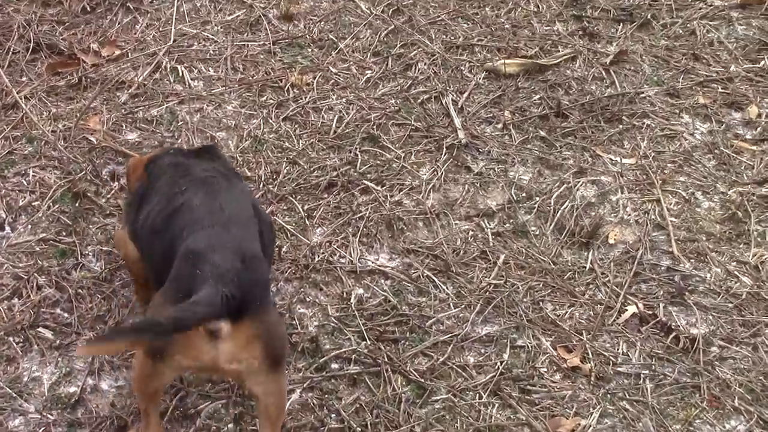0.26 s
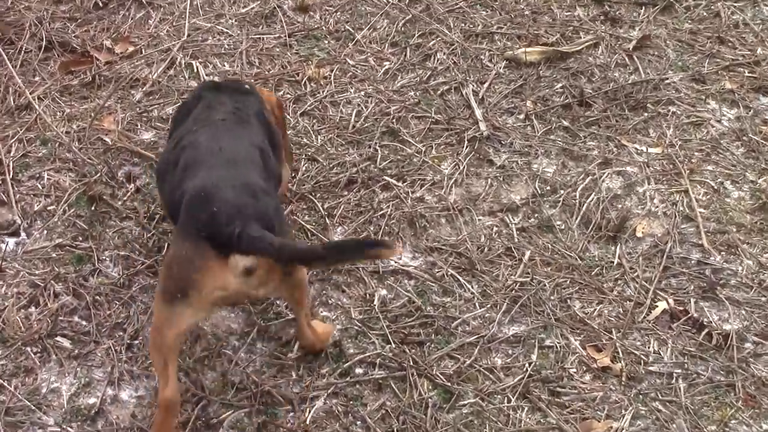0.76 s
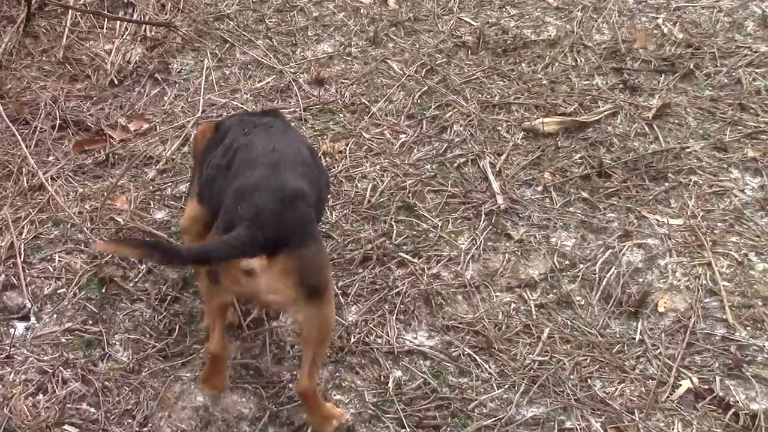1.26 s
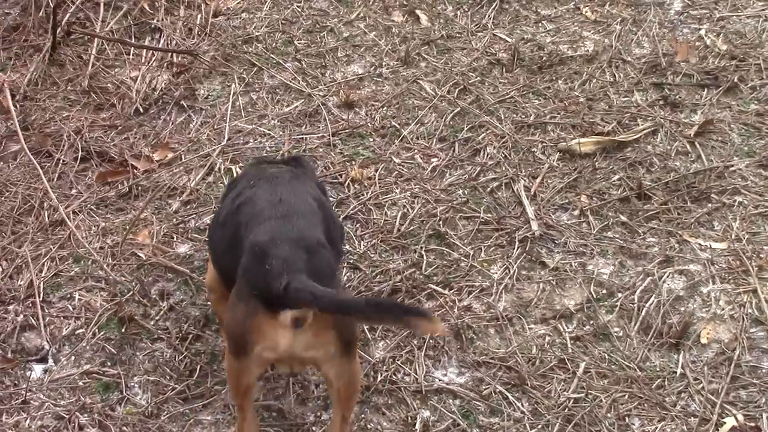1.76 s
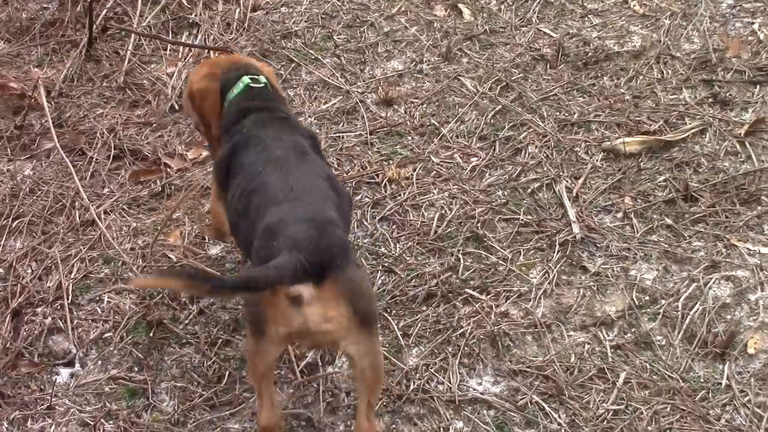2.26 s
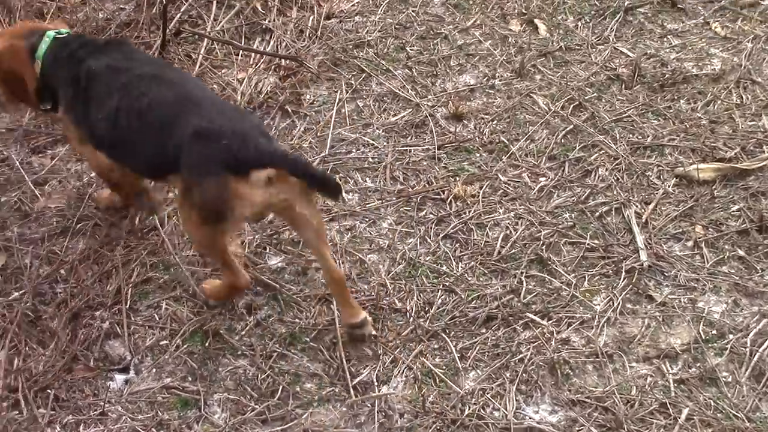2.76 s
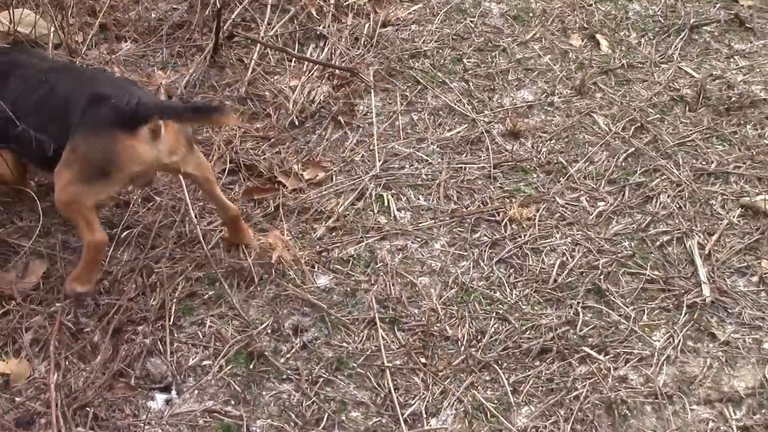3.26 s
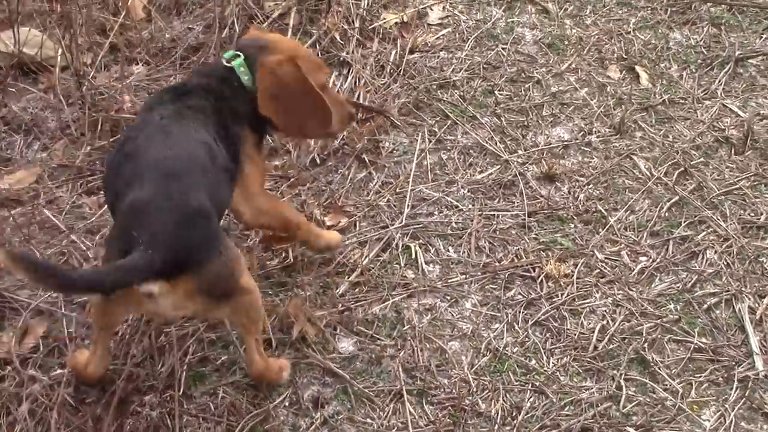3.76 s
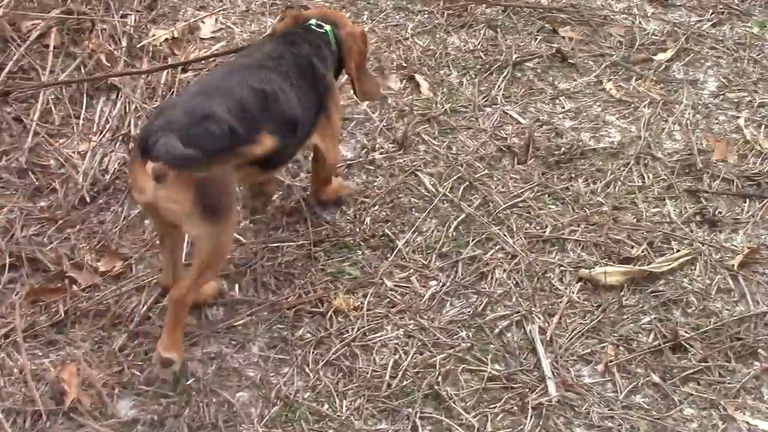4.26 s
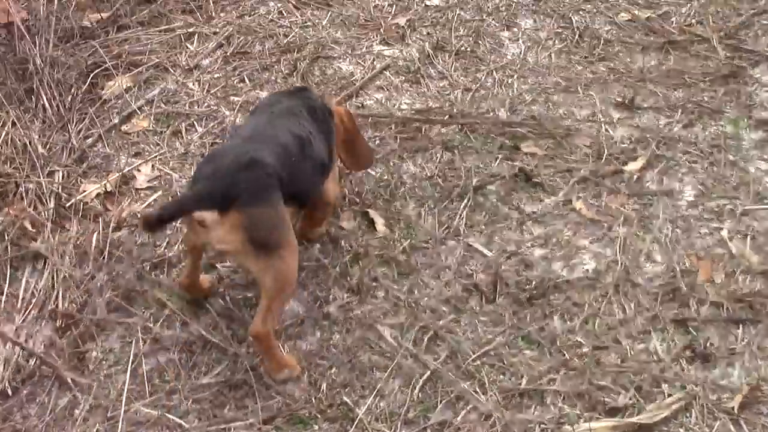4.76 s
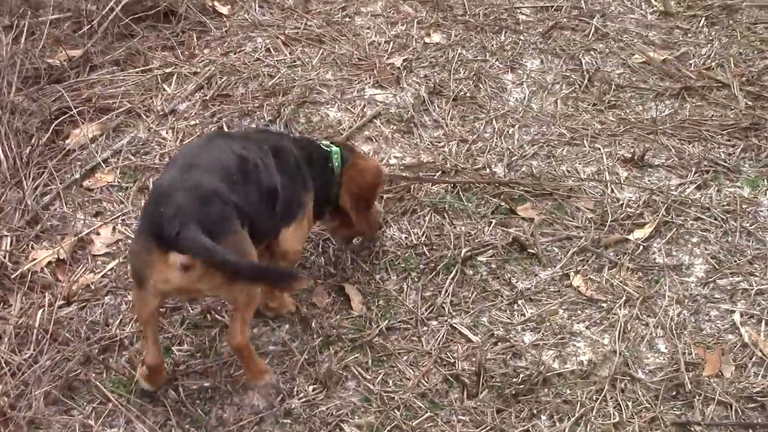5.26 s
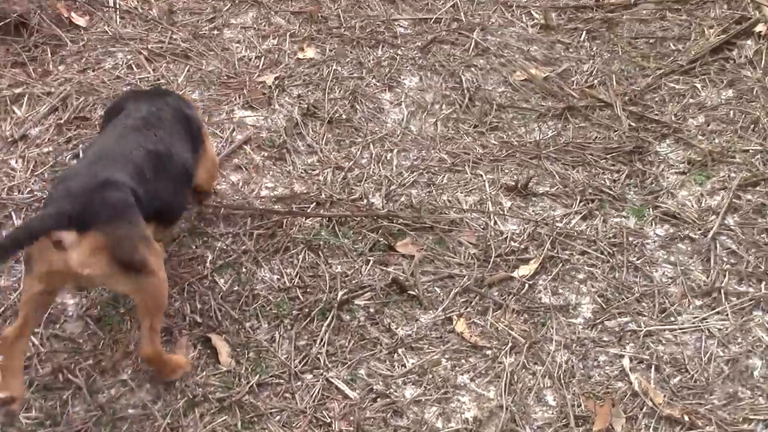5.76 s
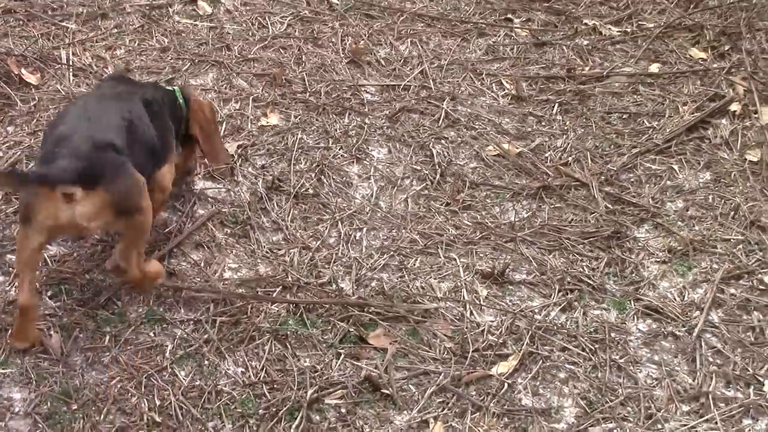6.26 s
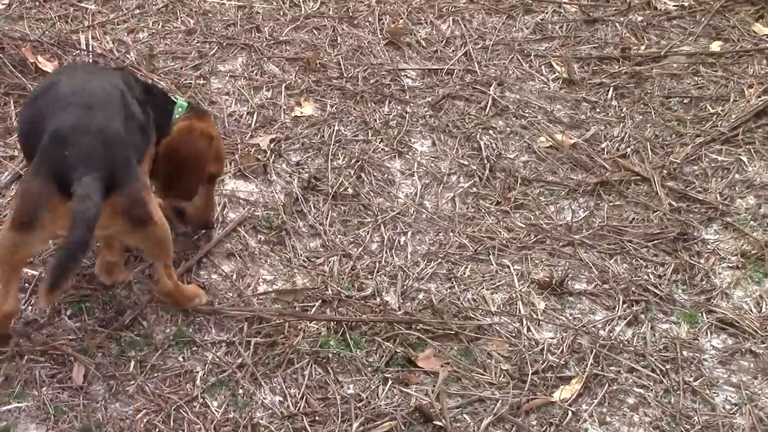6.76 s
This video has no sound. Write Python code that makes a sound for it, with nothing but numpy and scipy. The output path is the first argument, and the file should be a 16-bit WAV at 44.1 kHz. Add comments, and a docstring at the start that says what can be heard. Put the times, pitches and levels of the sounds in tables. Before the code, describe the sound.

Outdoors, close mono sound. From 0 to 0.7 s, low ragged wind rumbles on the microphone, with a hard cluster of buffets around 0.6 s; dry litter rustles, twigs snap, and a dog snorts airily near 0.26 s. The wind then falls away and a hound barks at about 0.7, 1.3, 2.0, 2.6, 3.55, 4.1, 4.7, 5.3, 5.8 and 6.5 s. Each bark lasts around 0.2 to 0.3 s, a bright, open-throated yelp rising quickly to a mid-high pitch, holding, then dropping as the mouth closes. Those from 2.0 to 4.1 s are hoarse and doubled; the one at 3.55 is weak, low and breathy. A faint sniff comes near 4.0 s. Twigs click near 3.0, 3.3, 4.1 and 5.6 s; small wind bumps come near 3.5, 4.6 and 6.45 s. Distant trees faintly echo the barks over a barely audible steady hush.

```python
"""Wind buffets the microphone while twigs snap, dry litter rustles and a dog snorts; then it barks ten times.
The wind is coloured bursts of noise plus single pushes that ring briefly; litter is noise and clicks.
The snort, and later a faint sniff in, are noise through nose rings. Each bark is an arched tone of 16 sine
partials shaped by throat and mouth, with rasp and breath made of noise; four hoarse barks add a second note.
Far trees return the barks faintly, over a very quiet steady hush."""
import sys
import numpy as np
from scipy import signal
from scipy.fft import rfft, irfft
from scipy.io import wavfile
from scipy.ndimage import uniform_filter1d

SR = 44100
rng = np.random.default_rng(int(sys.argv[2]) if len(sys.argv) > 2 else 0)


def transcribe(u):
    """Save the signal u as a 16-bit wav file named by the first command-line argument.

    u: samples, shape (n,) or (channels, n), limited to [-1, 1]; the rate is SR.
    q: integer samples, one column per channel.
    """
    v = np.clip(np.atleast_2d(u).T, -1, 1)
    q = np.round(v * 32767).astype(np.int16)
    wavfile.write(sys.argv[1], SR, q)


N = 308700
T = np.arange(N) / SR


def undb(db):
    """Turns decibels into a plain multiplier."""
    return 10 ** (np.asarray(db) / 20)


def unit(x):
    """Scales a sound to an average (RMS) strength of 1."""
    return x / np.sqrt(np.mean(x ** 2))


def curve(points):
    """Joins (time_s, value) points by straight lines."""
    return np.interp(T, *np.transpose(points))


def colour(x, points):
    """Changes the tone of x by (pitch_hz, gain_db) points, joined on a log pitch axis."""
    hz, db = np.transpose(points)
    f = np.maximum(np.arange(len(x) // 2 + 1) * SR / len(x), 1)
    gain = undb(np.interp(np.log(f), np.log(hz), db))
    return irfft(rfft(x) * gain, len(x))


def walk(rate):
    """Random levels, rate new ones a second, smoothed twice; spread 1."""
    k = int(SR / rate)
    steps = np.repeat(rng.standard_normal(N // k + 1), k)
    return unit(uniform_filter1d(uniform_filter1d(steps, k), k)[:N])


def ring(x, modes, patchy_db=0):
    """Sums resonances, each applied twice for deep valleys between them and flickering on its own."""
    out = 0
    for hz, width, db in modes:
        b, a = signal.iirpeak(hz, hz / width, SR)
        once = signal.lfilter(b, a, x)
        twice = signal.lfilter(b, a, once)
        out = out + undb(db + patchy_db * walk(70)) * unit(twice)
    return unit(out)


def grains(rate, scatter_db):
    """Random clicks, about rate a second, many small and few large."""
    hits = rng.random(N) < rate / SR
    return hits * rng.standard_normal(N) * undb(scatter_db * rng.exponential(size=N))


def wind():
    """Eddies thump on the microphone in ragged clusters; in strong gusts the higher part grows faster."""
    # strength of the wind over time: (time_s, level_db)
    gusts = [(0, -30), (.12, -29), (.16, -40), (.335, -31), (.35, -25.5), (.475, -26), (.49, -42),
             (.634, -15.5), (.7, -25.5), (.95, -56.5), (1.06, -88), (1.95, -93), (2.33, -63), (2.9, -73),
             (3.15, -56), (3.19, -67.5), (3.23, -44), (3.535, -41), (3.79, -51.5), (3.94, -45), (4.38, -45),
             (4.57, -29.5), (4.94, -46), (5.62, -41), (6.29, -49), (6.52, -37), (6.93, -49), (7, -70.5)]
    # colour of the low thumping: (pitch_hz, gain_db)
    low_colour = [(24, -71), (40, -38), (182, -1.5), (385, 3), (447, -2), (539, -2.5), (1200, -18.5),
                  (1720, -35.5), (3500, -58.5), (4550, -74.5), (7700, -120)]
    edge_colour = [(300, -23.0), (900, 8.0), (1800, 6.0), (4000, -22.0), (8000, -49)]
    gust_db = curve(gusts)
    clusters = undb(3.5 * walk(40))
    eddies = (grains(900, 1.2) + .1 * rng.standard_normal(N)) * clusters
    low = unit(colour(eddies, low_colour))
    edge = unit(colour(eddies, edge_colour))
    return undb(gust_db) * low + undb(1.855 * gust_db - 1.0) * edge + buffets()


def buffets():
    """Each hard buffet is a sudden push of wind that rings for a cycle or two and dies away."""
    # single buffets, levels before the final colouring: (start_s, level_db, pitch_hz)
    pushes = [(0.344, -21, 371), (0.395, -20, 308), (0.417, -26, 518), (0.468, -25.5, 463),
              (0.578, -16.5, 488), (0.61, -10.5, 416), (0.624, -3, 798), (0.645, -14, 575),
              (0.666, -9.5, 355), (3.478, -28, 425), (4.603, -25.5, 560), (6.442, -26.5, 396)]
    hiss_colour = [(500, 12), (2000, 11.5), (5000, -30.5)]
    out, t = np.zeros(N), T[:int(.03 * SR)]
    for start_s, db, hz in pushes:
        hiss = colour(rng.standard_normal(len(t)), hiss_colour)
        push = np.exp(-t / 0.0029) * (np.sin(2 * np.pi * hz * t) + 0.16 * hiss)
        out[int(start_s * SR):][:len(t)] += undb(db) * push
    return colour(out, [(60, -32), (250, 3.0)])


def litter():
    """Dry needles under the paws hiss and crackle: steady noise plus many small clicks."""
    # strength of the rustle over time: (time_s, level_db)
    rustle_points = [(0, -38.5), (.15, -48.5), (.33, -51), (.7, -46.5), (.95, -65), (1.26, -56.5),
                     (1.52, -74), (2.02, -59.5), (2.33, -62.5), (2.9, -48.5), (3.2, -55), (3.79, -54),
                     (4.38, -62.5), (4.6, -51), (4.94, -66.5), (5.53, -56.5), (6.2, -60.5), (6.52, -52),
                     (6.93, -63.5)]
    # colour of the rustle: (pitch_hz, gain_db)
    rustle_colour = [(880, -39), (1500, -7), (2560, -7), (4240, -9), (9850, -9), (13900, -15.5),
                     (16000, -6)]
    crackle = unit(grains(700, 2.5))
    rustle = unit(colour(rng.standard_normal(N) + 1.2 * crackle, rustle_colour))
    return undb(curve(rustle_points) + 0.5 * walk(36)) * rustle + snaps()


def snaps():
    """Each snapping twig is a few milliseconds of bright, quickly fading noise."""
    # twigs, levels before colouring: (start_s, level_db)
    twigs = [(0.041, -42), (0.132, -34), (0.4476, -33), (0.523, -25.5), (0.5474, -22.5), (0.5952, -22.5),
             (0.6808, -25), (2.4432, -41.5), (2.5486, -39.5), (2.9492, -34), (2.9937, -28.5), (3.266, -37),
             (3.3012, -30.5), (3.487, -33.5), (4.0869, -35), (4.122, -21.5), (4.6551, -36), (5.547, -35.5),
             (5.6196, -27.5), (5.7112, -32.5)]
    out, t = np.zeros(N), T[:int(.03 * SR)]
    for start_s, db in twigs:
        burst = undb(db) * np.exp(-t / 0.0036) * rng.standard_normal(len(t))
        mid_db, high_db = 6 * rng.standard_normal(2)  # no two twigs sound alike
        tone = [(800, -11), (2500, mid_db - 10), (5000, high_db - 5.5), (8000, -3.5), (15000, -12)]
        out[int(start_s * SR):][:len(t)] += colour(burst, tone)
    return out


def snort():
    """Air rushing through the nose, a snort and later a faint sniff in: noise through low and hissing rings."""
    # resonances of the nose, the lowest first: (pitch_hz, width_hz, relative_level_db)
    nose = [(1990, 960, 3.5), (4800, 1400, 4.5), (5970, 540, 0), (8900, 1500, 0.5), (12100, 3600, -1.5)]
    # rushes of air: (centre_s, spread_s, low_ring_level_db, hiss_level_db)
    rushes = [(0.259, 0.062, -36, -38.5), (4.03, 0.065, -55.5, -68)]
    low = ring(rng.standard_normal(N), nose[:1])
    hiss = ring(rng.standard_normal(N), nose[1:])
    out = 0
    for centre_s, spread_s, low_db, hiss_db in rushes:
        swell = np.exp(-.5 * ((T - centre_s) / spread_s) ** 2)
        out = out + swell * (undb(low_db) * low + undb(hiss_db) * hiss)
    return out


def window(start, end, fall_s=0.022):
    """Opens in 5 ms and closes over fall_s."""
    return np.interp(T, [start, start + 0.005, end - fall_s, end], [0, 1, 1, 0])


def barks():
    """Moves the voice: pitch scoops up, holds and drops; the mouth closes; rasp and breath follow."""
    # one row a bark: (start_s, rise_s, hold_s, fall_s, starting_pitch as share of the top,
    # top_pitch_hz, pitch_before_fall_hz, swell_s, level_db at start, after swell, before fall,
    # rasp_db after swell, before fall, breath_db, breath_peak as share of the bark,
    # then open and closed mouth: middle_ring_hz twice, middle_ring_db twice,
    # upper_ring_hz twice, upper_ring_db twice; closing_time_s)
    bark_rows = [ (0.708, 0.062, 0.1, 0.059, 0.49, 594, 592.6, 0.013, -28, -10.5, -18, -19, -30.5, -52.5, 0.043, 1435, 1255, 3, -12.5, 2370, 1775, -6, -15, 0.066),
                 (1.279, 0.038, 0.12, 0.06, .58, 530, 585.3, 0.038, -21, -11.5, -16, -19, -26, -46, 0.11, 1286, 1030, 4, -8, 2330, 1808, 0.5, -10.5, 0.071),
                 (2.033, 0.052, .17, 0.069, 0.63, 533, 489.8, 0.073, -20.5, -11, -34, -18.5, -37.5, -43, 0.22, 1240, 1000, 5, -7, 2295, 1653, -3.5, -12.5, 0.055),
                 (2.647, 0.081, 0.083, 0.065, 0.67, 533, 520, 0.071, -30, -22.5, -20, -27, -28.5, -39.5, .6, 1150, 1010, 4, -10, 2060, 1443, 10.5, -8, 0.052),
                 (3.55, 0.031, 0.16, 0.039, .72, 446.2, 430, 0.084, -30.5, -28, -30, -28, -31.5, -38, 0.77, 751.3, 904.5, 4, -2, 2124, 1570, 0.5, -1.5, 0.064),
                 (4.12, .08, 0.1, 0.053, .72, 531, 525, 0.094, -31, -13, -19, -21, -31.5, -39, 0.39, 1006, 956, 4, -21, 2270, 1470, 13.5, -23, 0.083),
                 (4.714, .075, .088, .048, 0.63, 586, 579.4, 0.032, -31, -6.5, -16, -19.5, -31, -44.5, 0.096, 1230, 1115, 2, -19, 1934, 1760, -12, -14, 0.045),
                 (5.282, 0.073, 0.1, 0.066, 0.58, 537, 519.7, 0.077, -34, -10.5, -18, -24, -34, -38.5, 0.3, 1290, 1069, -3, -8.5, 2256, 1672, 5, -14.5, 0.099),
                 (5.808, 0.049, 0.11, 0.053, 0.79, 524, 517, 0.053, -21.5, -8, -16.5, -19.5, -31, -47, 0.36, 1366, 1055, -3.5, -8, 2200, 1710, 0.5, -28, 0.075),
                 (6.533, 0.054, 0.11, 0.052, 0.67, 570, 584.7, 0.043, -31, -13, -17.5, -20.5, -26.5, -29, 0.24, 1297, 1129, 2, 0, 2380, 2121, -10, -10, 0.066),
                 ]
    # moments when the voice breaks and the rasp flares: (centre_s, spread_s, added_rasp_db)
    flares = [(1.31, 0.0076, 5), (2.713, 0.0092, 9), (2.82, 0.0077, 7), (3.725, .018, 7), (4.19, 0.018, 8),
              (5.89, 0.0091, 5)]
    end_pitch, scoop_bend, droop_bend = .45, 1.6, 1.1  # end as share of held pitch; curvatures of rise and fall
    drop_s, drop_db, end_db = 0.024, -14, -30.5  # the push gives out: a quick drop, then a fade
    arch_db = 1  # the push bulges in the middle of the hold
    open_s, shut_start_db = 0.01, -11.5  # the mouth opens first: its rings start this much weaker
    shut_hz, shut_db = 746, -2.5  # the middle ring goes here in the fall
    flare_db = -6  # the upper ring goes to this level in the fall
    rasp_first_db, rasp_last_db = -9.5, -3  # rasp at the very start and end, against its neighbours
    breath_first_db, breath_last_db = -12, -18  # breath at start and end, against its peak

    gate, hz, db, rasp_db, breath_db = np.zeros((5, N))
    jaw = np.zeros((4, N))  # middle ring Hz, dB, upper ring Hz, dB
    for (start, rise, hold, fall, low, top_hz, late_hz, swell, first_db, top_db, late_db,
         rasp, late_rasp, air, peak, *mouth, close) in bark_rows:
        late, length = rise + hold, rise + hold + fall
        on = slice(int(start * SR), int((start + length) * SR))
        t = T[on] - start
        falling = np.clip((t - late) / fall, 0, 1)

        scoop = (1 - low) * np.clip(1 - t / rise, 0, 1) ** scoop_bend
        droop = (1 - end_pitch) * falling ** droop_bend
        hz[on] = np.interp(t, [rise, late], [top_hz, late_hz]) * (1 - scoop) * (1 - droop)

        db[on] = np.interp(t, [0, swell, late, late + drop_s, length],
                           [first_db, top_db, late_db, late_db + drop_db, late_db + end_db])
        db[on] += arch_db * np.sin(np.pi * np.clip((t - swell) / (late - swell), 0, 1))

        opened, closed = np.reshape(mouth, (4, 2, 1)).transpose(1, 0, 2)
        jaw[:, on] = closed + (opened - closed) * np.exp(-t / close)
        jaw[1::2, on] += shut_start_db * np.exp(-t / open_s)
        shutting = np.sqrt(falling)
        jaw[:2, on] += shutting * (np.array([[shut_hz], [shut_db]]) - jaw[:2, on])
        jaw[3, on] += shutting * (flare_db - jaw[3, on])

        rasp_db[on] = np.interp(t, [0, swell, late, length],
                                [rasp + rasp_first_db, rasp, late_rasp, late_rasp + rasp_last_db])
        peak_s = np.clip(peak, 0, 1) * length
        breath_db[on] = air + np.interp(t, [0, peak_s, length], [breath_first_db, 0, breath_last_db])
        gate += window(start, start + length)
    for centre_s, spread_s, more_db in flares:
        rasp_db += more_db * np.exp(-.5 * ((T - centre_s) / spread_s) ** 2)
    return gate, hz, db, jaw, rasp_db, breath_db


def tract_db(f, jaw):
    """Gain at pitch f of the fixed throat ring and of three rings that change with the mouth."""
    # fixed throat ring: (pitch_hz, width_hz, gain_db)
    fixed_rings = [(611, 106.5, 0.5)]
    # overall tilt of the voice behind the rings: (pitch_hz, gain_db)
    slope = [(300, 5), (2400, -2), (2900, -3.5), (3400, -7.5), (4500, 0.5), (6000, -9), (9000, -17)]
    middle_hz, middle_db, upper_hz, upper_db = jaw
    top_db = -17.5 + 0.7 * upper_db  # the top ring follows part of the upper ring's level
    rings = fixed_rings + [(middle_hz, 205, middle_db), (upper_hz, 213, upper_db), (2750, 410, top_db)]
    power = sum(undb(db) ** 2 / (1 + ((f - hz) / width) ** 2) ** 2 for hz, width, db in rings)
    return 10 * np.log10(power) + np.interp(f, *np.transpose(slope))


def second_fold():
    """In the hoarse barks a second fold sings its own note: its gate, pitch and level."""
    # second notes, levels before mixing: (start_s, swell_s, fade_s, start_pitch_hz, end_pitch_hz, peak_db)
    notes = [(2.05, 0.1448, 0.046, 574, 617, -20), (2.68, 0.03, .136, 616, 611, -24),
             (3.555, 0.181, 0.028, 700, 590, -29.5), (4.15, 0.039, .172, 644, 582, -17.5)]
    edge_db = -27.5  # start and end, against the peak
    hoarse, hz_points, db_points = 0, [], []
    for start, swell, fade, first_hz, last_hz, top_db in notes:
        end = start + swell + fade
        hoarse = hoarse + window(start, end)
        hz_points += [(start, first_hz), (end, last_hz)]
        db_points += [(start, top_db + edge_db), (start + swell, top_db), (end, top_db + edge_db)]
    return hoarse, curve(hz_points), curve(db_points)


def hound():
    """Vocal folds sing the partials; air through them rasps in the throat and hisses in the mouth."""
    # throat rings for the rasp: (pitch_hz, width_hz, relative_level_db)
    throat = [(619, 85, 4.5), (1150, 407, -1), (1570, 380, -3), (2220, 395, -8.5), (2530, 120, -21)]
    # mouth rings for the breath: (pitch_hz, width_hz, relative_level_db)
    mouth = [(4290, 600, -6.5), (5620, 500, -1.5), (7000, 690, -4.5), (7460, 1200, 1.5), (8340, 2600, 7),
             (11400, 1500, 1)]
    # mixtures of the two notes: (multiple of the main pitch added, relative_level_db)
    beat_rows = [(0, 2.5), (1, -27.5), (1.998, -4.5), (3.001, -25.5)]
    grit_db, airy_db = -5.5, -2  # the rasp splits into rough overtones and plain air in the throat

    gate, hz, voice_db, jaw, rasp_db, breath_db = barks()
    hoarse, fold_hz, fold_db = second_fold()
    # the second fold unsettles pitch and level of the first
    unrest = .002 + .012 * hoarse
    phase = 2 * np.pi * np.cumsum(hz * (1 + unrest * walk(150))) / SR  # cycles are never quite equal
    grit = np.minimum(undb(rasp_db - voice_db + grit_db), 1.5)
    tone = 0
    for k in range(1, 17):
        shimmer_db = (.4 + .7 * hoarse) * min(k, 3) * walk(80)
        level = undb(voice_db + tract_db(k * hz, jaw) + shimmer_db)
        roughness = 1 + min(k - 1, 1) * grit * walk(400)  # the lowest partial gets no grit
        tone = tone + level * roughness * np.sin(k * phase - (k - 1) * np.pi / 2)

    rasp = undb(rasp_db + airy_db) * ring(rng.standard_normal(N), throat, patchy_db=2.5)
    puffs = 1 + .5 * np.cos(phase)  # the air comes once a cycle
    breath = undb(breath_db) * ring(rng.standard_normal(N), mouth, patchy_db=4.0) * puffs

    fold_phase = 2 * np.pi * np.cumsum(fold_hz * (1 + 0.0225 * walk(120))) / SR
    beats = sum(undb(db + 2.5 * walk(70)) * np.sin(fold_phase + k * phase) for k, db in beat_rows)
    second_note = hoarse * undb(fold_db) * np.sqrt(2) * beats
    return gate * (np.sqrt(2) * tone + rasp + breath) + second_note


def trees(x):
    """Trunks return a late, slowly fading, dull smear, one clearer answer after 0.1 s
    and a second, almost inaudible one."""
    # nearer stands of trees, levels before colouring: (delay_s, level_db)
    stands = [(0.101, -32), (0.318, -64.5)]
    t60_s, smear_db, gap_s = 2.1, -41, 0.27  # time to fade by 60 dB, level before colouring, build-up time
    reply_colour = [(300, -35), (600, -1.5), (1200, -9.5), (2500, -5), (6000, -20)]
    t = T[:int(1.5 * SR)]
    smear = np.clip(t / gap_s, 0, 1) ** 2 * undb(-60 * t / t60_s)
    shapes = [(smear, smear_db)]
    shapes += [(np.exp(-.5 * ((t - delay_s) / .0015) ** 2), db) for delay_s, db in stands]
    swell = sum(undb(db) * shape / np.sqrt(np.sum(shape ** 2)) for shape, db in shapes)
    reply = colour(rng.standard_normal(len(t)), reply_colour)
    return signal.fftconvolve(x, reply * swell)[:N]


def hush():
    """A very quiet, steady background of coloured noise."""
    tone = [(150, -19.5), (500, 4.0), (2000, 4), (6000, -7.0), (15000, -41)]
    return undb(-68) * unit(colour(rng.standard_normal(N), tone))


def scene():
    """Adds all the sounds into one channel."""
    dog = hound()
    return (wind() + litter() + snort() + dog + trees(dog) + hush())[None]


def record(dry):
    """A slightly lopsided amplifier adds a trace of rumble under loud sounds and rounds peaks; the top is cut."""
    rumble_band = signal.butter(2, [30, 300], "band", fs=SR, output="sos")
    bend = signal.sosfilt(rumble_band, dry ** 2)
    rounded = dry / (1 + (dry / .95) ** 4) ** .25 + .014 * bend
    top_cut = signal.ellip(8, .2, 85, 15850, fs=SR, output="sos")  # low-pass at 15850 Hz
    return signal.sosfilt(top_cut, rounded)


dry = scene()
out = record(dry)
transcribe(out)
```